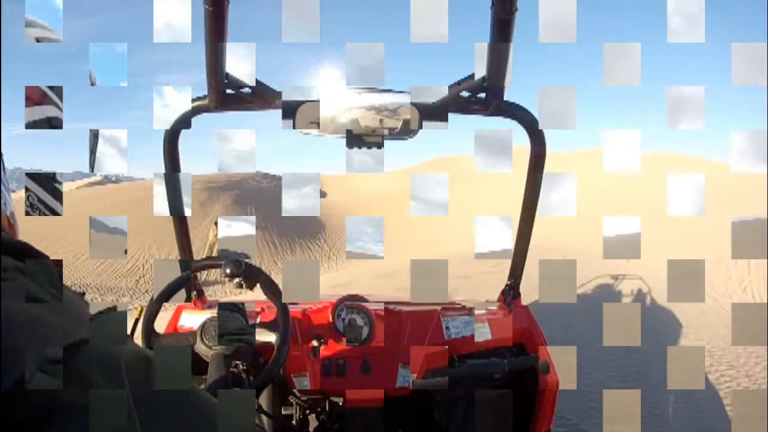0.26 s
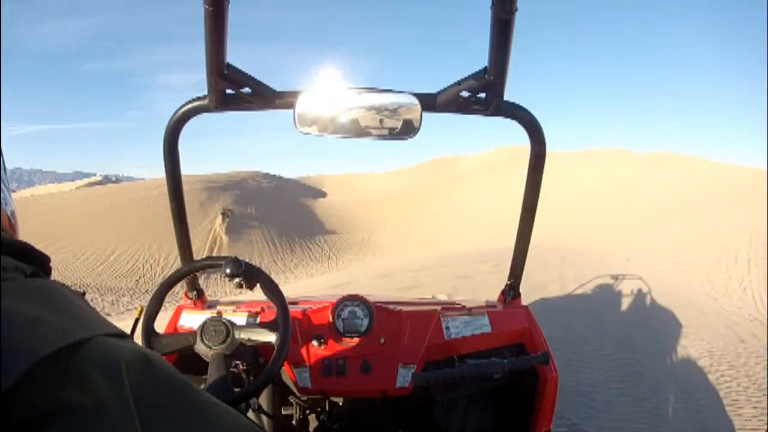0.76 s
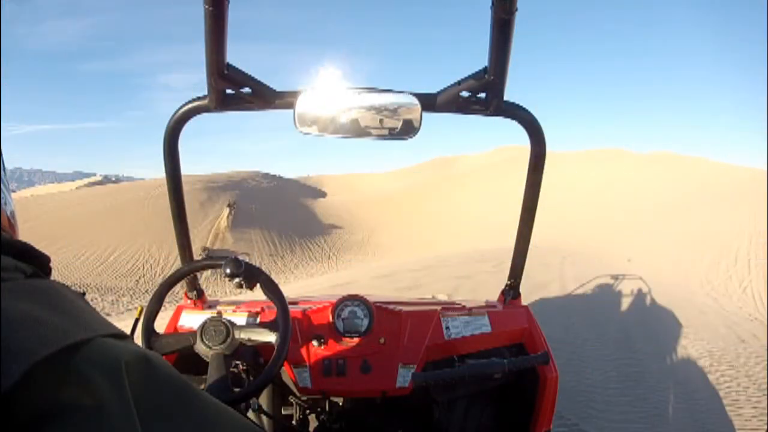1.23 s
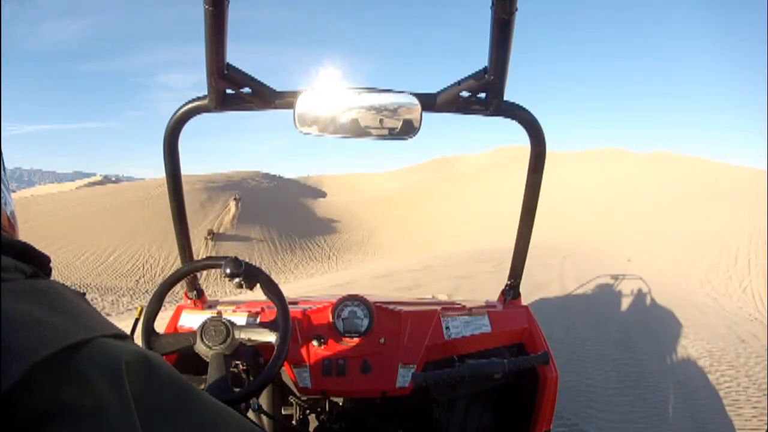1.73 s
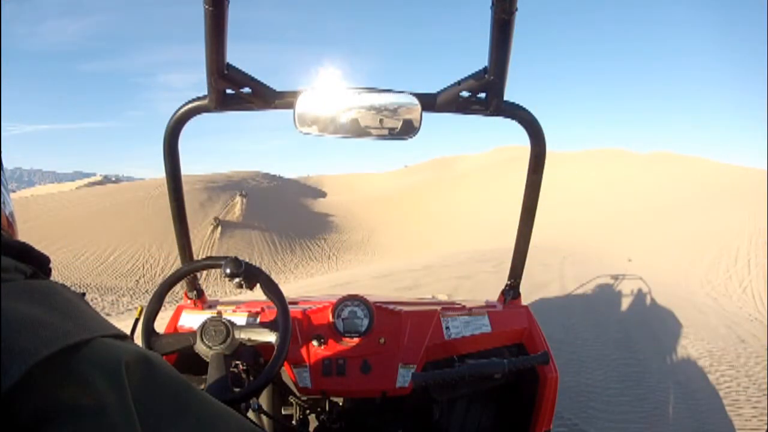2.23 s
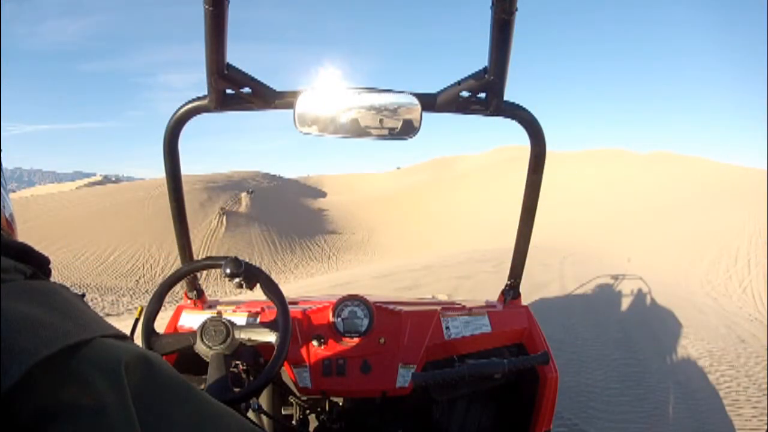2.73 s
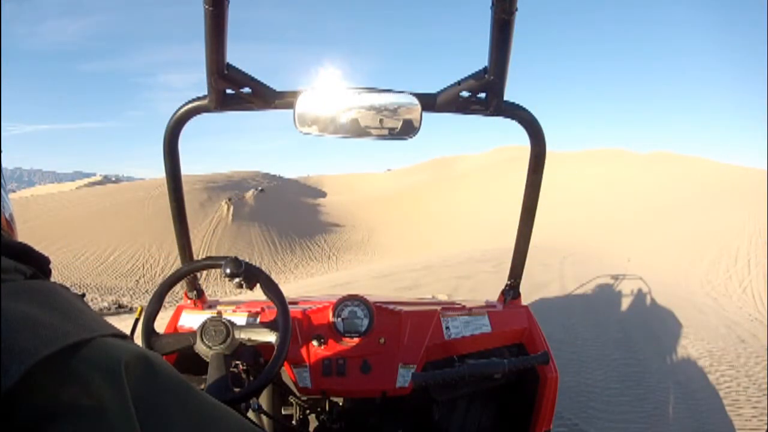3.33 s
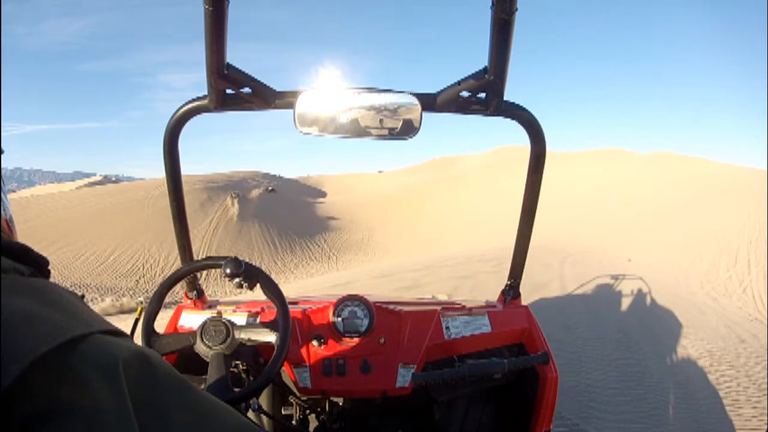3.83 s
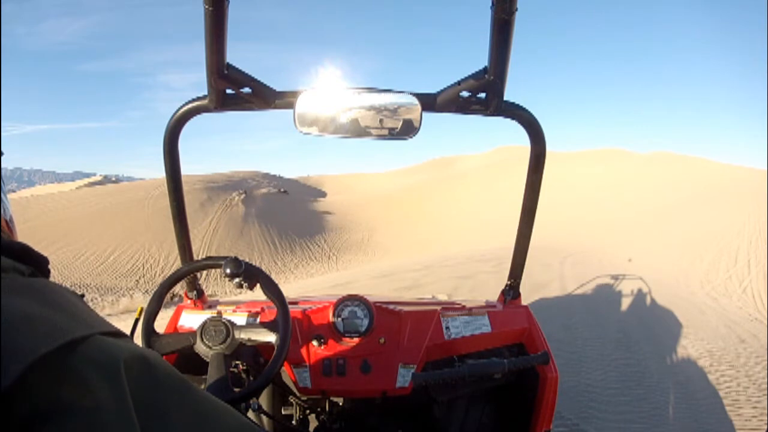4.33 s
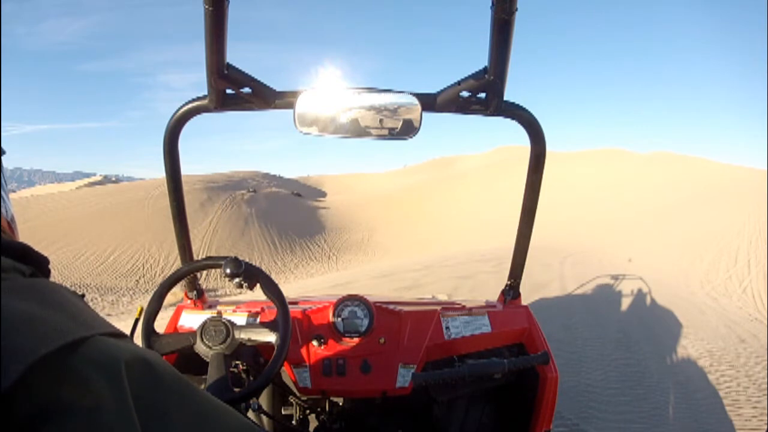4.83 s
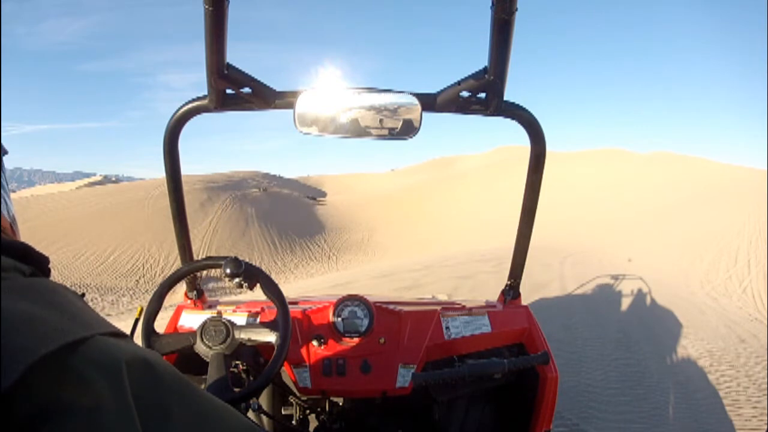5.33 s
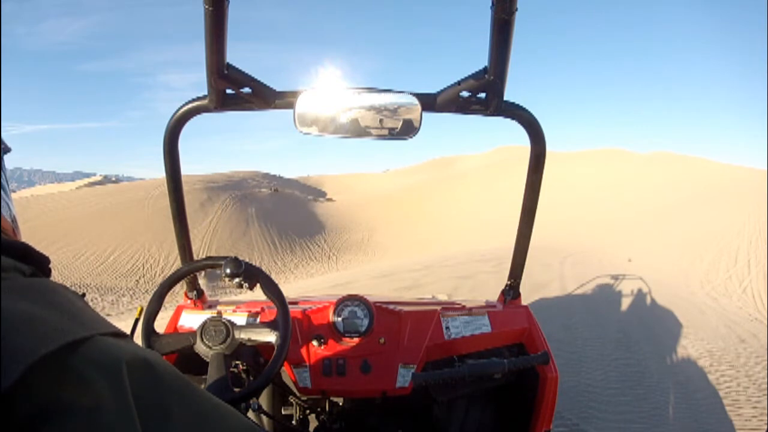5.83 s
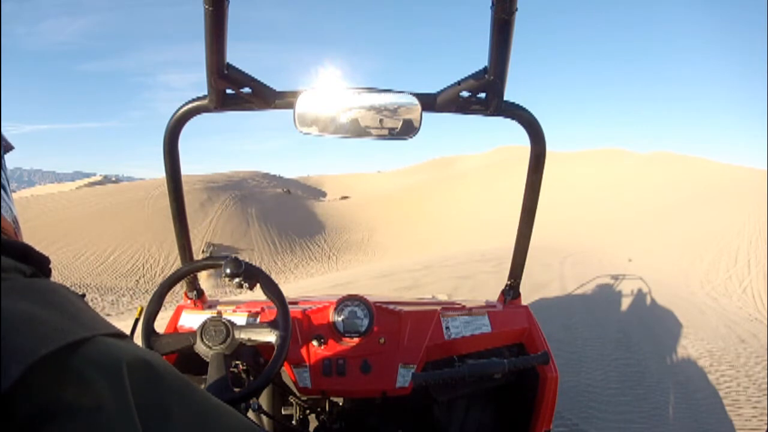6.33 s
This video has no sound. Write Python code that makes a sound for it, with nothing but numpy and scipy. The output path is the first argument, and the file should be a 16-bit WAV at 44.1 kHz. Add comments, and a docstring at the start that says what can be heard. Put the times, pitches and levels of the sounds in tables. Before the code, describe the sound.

A brief close off-road engine roar stops abruptly, leaving faint muffled far motors, soft wind thuds, small plastic ticks and footsteps in sand.

```python
"""A twin engine drones close by in the wind: a camera in a closed housing rides an open buggy.
Then a hard cut to the parked buggy among dunes: one far engine revs twice, another nears as a low tone, wind
thuds on the housing and feet crunch nearby. Engines are sines at multiples of their speed; wind and sand are
coloured noise, and the housing adds its resonances.
The camera holds each sample for 1/12000 s, which mirrors the sound around 12 kHz."""
import sys
import numpy as np
from scipy import signal
from scipy.fft import rfft, irfft, next_fast_len
from scipy.io import wavfile
from scipy.ndimage import uniform_filter1d

SR = 44100
rng = np.random.default_rng(int(sys.argv[2]) if len(sys.argv) > 2 else 0)


def generate_wav(sig):
    """Save sig (samples, or channels by samples) to the path in sys.argv[1] as 16-bit PCM at SR."""
    pcm = np.round(np.clip(np.atleast_2d(sig).T, -1, 1) * 32767).astype(np.int16)
    wavfile.write(sys.argv[1], SR, pcm)


N = 289737
CUT_S = .6638  # the drive ends and the parked scene begins


def amp(db):
    """Turns decibels into a gain."""
    return 10 ** (np.asarray(db) / 20)


def evened(x):
    """Scales a sound to an average (rms) level of 1."""
    return x / np.sqrt(np.mean(x ** 2) + 1e-20)


def curves(rows):
    """Joins the rows of a table by straight lines: one curve for each column after the time."""
    s, *columns = np.transpose(rows)
    return [np.interp(np.arange(N) / SR, s, column) for column in columns]


def swells(rows):
    """Bell-shaped rises and falls in level."""
    t = np.arange(N) / SR
    return sum(amp(db) * np.exp(-((t - s) / np.where(t < s, rise, fall)) ** 2)
               for s, db, rise, fall in rows)


def shaped(x, points):
    """Colours a sound by a spectrum; padding keeps the start from wrapping round to the end."""
    f, db = np.transpose(points)
    size = next_fast_len(len(x) + SR)
    hz = np.fft.rfftfreq(size, 1 / SR)
    gain = amp(np.interp(np.log(hz + 1), np.log(f + 1), db))
    return irfft(rfft(x, size) * gain, size)[:len(x)]


def resonate(x, hz, width):
    """A resonance of gain 1: shifts its frequency down to zero, smooths, and shifts back."""
    turn = np.exp(2j * np.pi * np.cumsum(hz * np.ones(len(x))) / SR)
    r = np.exp(-np.pi * width / SR)
    return 2 * (turn * signal.lfilter([1 - r], [1, -r], x / turn)).real


def modes(x, table):
    """A body that rings at its own frequencies (modes), added with alternating sign."""
    return sum((-1) ** k * amp(db) * resonate(x, hz, width) for k, (hz, width, db) in enumerate(table))


def drift(per_s, length=N):
    """Slow random wandering of rms 1, smoothed over about 1/per_s seconds."""
    steps = rng.standard_normal(length // 64 + 2)
    span = int(SR / 64 / per_s / 2) + 1
    smooth = uniform_filter1d(uniform_filter1d(steps, span), span)
    return np.interp(np.arange(length) / 64, np.arange(len(steps)), evened(smooth))


def stack(hz, multiples, levels, waver_db, per_s):
    """Sines at multiples of a speed, each wavering in level and phase as firings differ."""
    turns = 2 * np.pi * np.cumsum(hz) / SR
    total = 0
    for k, level in zip(multiples, levels):
        wavering = level * amp(waver_db * drift(per_s, len(hz)))
        phase = 2 * np.pi * rng.random() + 0.16 * drift(per_s, len(hz))
        total = total + wavering * np.sin(k * turns + phase)
    return total


# The ridden engine. Each row: time in seconds, crank turns in Hz, exhaust level in dB, rattle level in dB.
DRIVE = [(0.0, 48.2, -20, -23), (0.044, 48.6, -21.5, -24), (0.66, 49.06, -21.5, -26)]
# Balance of the exhaust tones in dB, one for each multiple 2-34 of the crank speed.
EXHAUST_ORDERS = [4, -20, -3, -22, -19, -34, -4, -7, -7, -20, -8, -16, -6, 0, -2, -6, -22, -15, -20, -30,
                  -12, -20, -30, -30, -19, -24, -11, -20, -30, -24, -30, -7, -12]
# Colour of the shaking frame and panels. Each row: frequency in Hz, relative noise level in dB per Hz.
RATTLE_COLOUR = [(88, -10), (150, 2), (204, -7), (333, -15), (383, -3.5), (626, -1.5), (741, 3),
                 (993, -14.5), (1270, -5.5), (1750, -13), (2300, -14), (3240, -21.5), (3780, -23),
                 (4500, -40), (5900, -44), (7670, -71)]
# Ringing panels. Each row: frequency in Hz, width in Hz, relative level in dB.
PANELS = [(542, 18, -1), (730, 75, -6), (1261, 14, 8), (1387, 22, -5), (1615, 9.3, 4.5), (1850, 68, -3.5),
          (1940, 10, -6), (2160, 8.4, -8), (2590, 25, -21), (2620, 12, -9), (2940, 14, -8.5),
          (3764, 133, -9.5), (4040, 20, -10)]
HALF_ORDER_DB = -26  # the engine rocks the frame at 1.5 times crank speed


def own_engine():
    """Exhaust tones at multiples of the crank speed, and frame and panels rattled at each firing."""
    hz, exhaust_db, rattle_db = (curve[:round(CUT_S * SR)] for curve in curves(DRIVE))
    multiples = 2 + np.arange(len(EXHAUST_ORDERS))
    exhaust = evened(stack(hz, multiples, amp(EXHAUST_ORDERS), waver_db=1.5, per_s=7))
    rocking = stack(hz, [3 / 2], [amp(HALF_ORDER_DB)], waver_db=3, per_s=9)
    firing = (2 * np.cumsum(hz) / SR) % 1  # two firings a turn; 0-1 from one to the next
    shake = (1.1 + np.exp(-firing / 0.52)) * rng.standard_normal((len(PANELS) + 1, len(hz)))
    panels = sum(modes(own, [panel]) for own, panel in zip(shake[1:], PANELS))
    rattle = amp(-2.0) * evened(shaped(shake[0], RATTLE_COLOUR)) + amp(-3.0) * evened(panels)
    engine = amp(exhaust_db) * exhaust + amp(rattle_db) * rattle + rocking
    return np.pad(engine, (0, N - len(hz)))


# The loudest low thuds that jolts and gusts knock into the housing.
# Each row: time in seconds, strength in dB before the housing colours it, length in seconds (0.01 at least).
THUDS = [(0.04, -0.5, 0.0083), (0.068, -4.5, .018), (0.114, -0.5, 0.012), (0.147, -0.5, 0.013),
         (0.185, -1.5, 0.013), (0.293, 0.5, 0.012), (0.328, 0, 0.011), (0.387, -7, 0.012),
         (0.463, -2.5, 0.013), (0.537, -3.5, 0.017), (0.583, -7, 0.039), (1.333, -28, 0.055),
         (1.58, -29.5, 0.02), (2.109, -27.5, 0.025), (3.142, -32, .03), (3.603, -32.5, 0.023),
         (3.775, -25.5, 0.059), (3.908, -27, 0.021), (3.982, -27.5, 0.06), (4.049, -24, 0.011),
         (4.126, -30.5, 0.016), (4.498, -29.5, 0.081), (4.652, -30.5, 0.032), (4.962, -25, 0.023)]
# The housing's lowest resonances. Each row: frequency in Hz, level in dB per Hz.
BOOM = [(20, -21.5), (42, -28), (54, -24.5), (66, -3), (74, 0), (86, -9), (99, -3), (112, -9), (124, -8.5),
        (160, -28.5), (300, -71), (20000, -99)]
# Steady wind: at the start and the end of the drive.
HEADWIND_DB, SLOWING_DB = -26, -29
# Wind when parked: its level counted from time 0, and how fast it freshens.
BREEZE_DB, FRESHENS_DB_PER_S = -51, 0.8


def buffet():
    """Wind and single short pushes both ring the housing's lowest resonances."""
    t, pushes = np.arange(N) / SR, np.zeros(N)
    driving_db = HEADWIND_DB + (SLOWING_DB - HEADWIND_DB) * t / CUT_S
    parked_db = BREEZE_DB + FRESHENS_DB_PER_S * t
    level_db = np.where(t < CUT_S, driving_db, parked_db)
    wind = amp(level_db + 1.5 * drift(4.3)) * evened(shaped(rng.standard_normal(N), BOOM))
    for (s, db, length), start in zip(THUDS, rng.random(len(THUDS))):
        bell = np.exp(-2.8 * ((t - s) / max(length, .01)) ** 2)
        pushes += amp(db) * bell * np.sin(2 * np.pi * (86. * t + start))
    return wind + shaped(pushes, BOOM)


# The far engine that revs twice. Each row: time in seconds, engine cycles in Hz.
REV_SPEED = [(.67, 19), (1.05, 20.5), (1.35, 22.8), (1.65, 23.3), (2.1, 23.4), (2.4, 21.1), (2.7, 20.65),
             (3.3, 20.5), (3.65, 20.9), (4.45, 21), (4.75, 19.75), (5.05, 20.6), (5.25, 22), (5.7, 23.2),
             (6.2, 24.1), (6.57, 24.25)]
# Its throttle. Each row: time in seconds, load from 0 to 1.
REV_LOAD = [(1.05, 0.63), (1.4, 0.89), (2.15, 0.99), (2.4, 0.4), (3.8, 0.17), (4.8, 0.1), (5.4, 0.65),
            (5.9, 0.46)]
# Balance of its tones in dB, one for each multiple 4-19 of the cycle speed: under load, then coasting.
PULLING = [-18, 4, -14, -15, -13, -13, -11, -10, -8, -8, -15, -21, -30, -34, -36, -36]
COASTING = [-6, -10, -8, -14, -2, -18, -9, -22, -22, -18, -24, -12, -26, -26, -28, -15]
REV_IDLE_DB, REV_FULL_DB = -54.5, -47  # added to those balances without load and at full load
# Single tones that sing out for a while.
# Each row: multiple of the cycle speed, time of the crest in seconds, level in dB, rise and fall in seconds.
WHINES = [(19, 0.945, -62, 0.42, 0.25), (19, 4.23, -64, 1.3, 0.32), (9, 6.15, -50.5, 0.18, 0.25),
          (8, 4.17, -55.5, 0.26, 0.29), (18, 5.41, -56, 0.51, 0.29), (18, 6.32, -62, 0.29, 0.74),
          (34, 6.4, -60.5, 0.17, 0.4)]
# The second far engine, one firing tone that nears and sags. Each row: time in seconds, Hz, level in dB.
HUMMER = [(2.8, 146, -72), (3.5, 143.5, -53), (4.09, 141, -48), (4.91, 133.6, -39.5), (5.3, 131.8, -39.5),
          (5.94, 130.6, -38.5), (6.57, 130.6, -42.5)]


def far_engines():
    """Load blends the first engine from its coasting to its pulling tones; the second is one low tone."""
    (hz,), (load,) = curves(REV_SPEED), curves(REV_LOAD)
    levels = []
    for idle_db, pull_db in zip(COASTING, PULLING):
        levels.append(amp((1 - load) * (REV_IDLE_DB + idle_db) + load * (REV_FULL_DB + pull_db)))
    revver = stack(hz, range(4, 20), levels, waver_db=3, per_s=6)
    whine_levels = [swells([row]) for _, *row in WHINES]
    whine = stack(hz, [round(k) for k, *_ in WHINES], whine_levels, waver_db=3.5, per_s=10)
    tone_hz, tone_db = curves(HUMMER)
    hummer = stack(tone_hz, [1], [amp(tone_db)], waver_db=.8, per_s=4)
    return revver + whine + hummer


# Sand underfoot. Each row: time in seconds, strength in dB, low and high modes in dB against the middle
# before each band's own gain, and time in seconds to die away by 60 dB.
CRUNCHES = [(1.318, -34, -1, -14, 0.22), (1.962, -44, 5.5, -10, 0.19), (2.161, -47, 6, -5.5, 0.16),
            (3.107, -33, -5.5, -14.5, 0.16), (4.25, -47.5, 7.5, -18.5, 0.2), (4.292, -44.5, 6, -6.5, 0.15),
            (4.31, -49, -6, -3, 0.23), (4.322, -45.5, 11, -14, 0.063), (5.18, -33.5, -1, -14, 0.17),
            (5.875, -43, 6.5, -8, 0.1), (6.43, -37, -3, -11.5, 0.23)]
# The housing's modes, shared by all sand and tick sounds.
# Each row: frequency in Hz, width in Hz, relative level in dB.
HOUSING = [(660, 56, 3.5), (769, 48, 0.5), (826, 11.4, 7), (929, 12, 2), (1117.5, 25, 2.5), (1378, 20, 7.5),
           (1467, 35, 2.5), (1612, 14, 9), (1654, 21, 2.5), (1878, 32, 10), (2690, 23, -1), (2950, 19, 3),
           (3337, 117, 3), (3664, 76, 5), (3850, 17, 1), (4105, 48, -11), (4610, 97, -17.5),
           (4680, 39, -12), (5260, 50, -15.5), (5670, 55, -14)]
# Colour of hissing sand, here and in the open air. Each row: frequency in Hz, relative level in dB per Hz.
HISS = [(300, 0), (450, 1), (746, -30), (877, -22), (1000, -8), (1300, -5.5), (1750, -2.5), (2800, -8.5),
        (3070, -13), (3250, -7.5), (3900, -9), (4300, -13), (5900, -23.5), (7000, -69)]
# Colour of sliding sand, here and in the scuffs. Each row: frequency in Hz, relative level in dB per Hz.
SLIDE = [(700, -22), (1500, -2), (2600, -3), (3800, 0), (4200, -15), (5500, -17), (5900, -32), (7000, -60)]


def crunches():
    """Grains of sand land at once, die away, trickle on, and ring the low, middle and high housing modes."""
    t, low, middle, high = np.arange(N) / SR, np.zeros(N), np.zeros(N), np.zeros(N)
    for s, db, low_db, high_db, t60 in CRUNCHES:
        age = np.maximum(t - s, 0)
        trickle = amp(-16.0 - 60 * age / 1.1)
        onset = 1 - np.exp(-age / 0.0015)
        shape = amp(db) * (amp(-60 * age / t60) + trickle) * onset
        low += shape * amp(low_db)
        middle += shape
        high += shape * amp(high_db)
    grains = rng.standard_normal(N) * amp(4 * drift(250))
    body = amp(-12.5) * evened(modes(grains, HOUSING[4:10])) + amp(-17.0) * evened(shaped(grains, HISS))
    treble = modes(grains, HOUSING[10:15]) + amp(17.5) * modes(grains, HOUSING[15:])
    edge = evened(shaped(treble, SLIDE))
    return amp(7.0) * modes(low * grains, HOUSING[:2]) + middle * body + high * edge


# Small plastic ticks. Each row: time in seconds, strength in dB, hollow ring in Hz,
# hollow ring in dB against the strength, treble in dB before its own gain.
TICKS = [(2.996, -41, 410, -14, -15), (3.596, -31, 408, -9, -5.5), (3.752, -33, 412, -8, -24),
         (3.976, -45, 580, -2.5, -19), (4.106, -51, 560, 1, -24), (4.483, -47, 420, -2, -40),
         (4.769, -37, 404, -9, -7), (4.998, -41, 413, -7, 0.5), (5.065, -37, 408, -10, -19),
         (5.155, -43, 408, -12, -20), (5.42, -38, 550, -11, -24)]


def ticks():
    """A dull click, a short hollow ring of the part itself, and the housing's modes."""
    out, t = np.zeros(N), np.arange(4000) / SR
    pulse = np.exp(-t / 0.0012) * (1 - np.exp(-t / 0.00068))
    click = pulse * rng.standard_normal((len(TICKS), len(t)))
    typical = np.linalg.norm(click) / np.sqrt(len(TICKS))
    click *= typical / np.linalg.norm(click, axis=1, keepdims=True)  # alike in energy
    for (s, db, ring_hz, ring_db, bright_db), crack in zip(TICKS, click):
        ring = np.sin(2 * np.pi * ring_hz * t) * amp(-60 * t / .06)
        body = amp(10.5) * modes(crack, HOUSING[:9])
        edge = amp(10.0) * modes(crack, HOUSING[10:]) + 0.59 * crack
        part = out[round(s * SR):][:len(t)]
        part += amp(db) * (amp(ring_db) * ring + body + amp(bright_db) * edge)
    return out


# Feet dragged through sand. Each row: time of the crest in seconds, level in dB, rise and fall in seconds.
SCUFFS = [(3.16, -61, 0.18, 0.11), (6.1, -55.5, 0.1, 0.11), (6.22, -55, 0.12, 0.2)]


def scuffs():
    """Sliding sand: a bright rush of noise that swells and fades."""
    sand = rng.standard_normal(N) * amp(1.8 * drift(150))
    rush = evened(shaped(sand, SLIDE)) + amp(-1.5) * evened(modes(sand, HOUSING[11:16]))
    return swells(SCUFFS) * rush


# One brief high sizzle, a single row: level in dB, Hz, width in Hz, seconds to die away by 60 dB.
SIZZLE = (-57, 5400, 350, 0.06)
SIZZLE_S = 6.305  # its start


def sizzle():
    """A narrow burst of treble noise, passed twice through one resonance."""
    db, hz, width, t60 = SIZZLE
    age = np.arange(N) / SR - SIZZLE_S
    band = evened(resonate(resonate(rng.standard_normal(N), hz, width), hz, width))
    return band * (age > 0) * amp(db - 60 * np.maximum(age, 0) / t60)


def faint_tone():
    """A thin 511 Hz tone that sets in at 1 s and fades over about half a second, wavering slightly."""
    level = swells([(1, -66.5, 0, 0.5)])  # crest in s, dB, rise and fall in s
    return stack(np.full(N, 511), [1], [level], waver_db=1.5, per_s=5)


# Hiss of wind and sand in the open air. Each row: time in seconds, level in dB.
AIR = [(.67, -48), (.9, -52.5), (1.4, -55.5), (2.1, -58.5), (2.5, -60.5), (4.1, -63.5), (4.9, -64.5),
       (5.4, -59), (6.57, -52.5)]
# Colour of the low wash. Each row: frequency in Hz, relative level in dB per Hz.
WASH = [(59, -23), (100, -5.5), (303, -14), (412, -16.5), (468, -31), (600, -19.5), (780, -20.5),
        (1320, -120)]
WASH_DB, WASH_FROM_S, WASH_RISE_DB_PER_S = -55.5, 1.4, 20  # builds up until WASH_FROM_S, then holds


def air():
    """Low wash of wind and far traffic, and sand hiss heard through the housing: coloured noise."""
    hiss_db, = curves(AIR)
    wash_db = WASH_DB + WASH_RISE_DB_PER_S * np.minimum(np.arange(N) / SR - WASH_FROM_S, 0)
    gusts_db = 1.3 * drift(9)
    wash = evened(shaped(rng.standard_normal(N), WASH)) * amp(wash_db + gusts_db)
    grit = rng.standard_normal(N) * amp(1.04 * drift(20.1))
    hiss = amp(-2.5) * evened(shaped(grit, HISS)) + amp(-2.0) * evened(modes(grit, HOUSING))
    return wash + amp(hiss_db) * hiss


def scene():
    """The drive is cut straight to the quiet dunes; one microphone feeds both channels."""
    parked = np.arange(N) >= CUT_S * SR
    dunes = far_engines() + faint_tone() + air() + scuffs() + crunches() + ticks() + sizzle()
    mono = own_engine() + buffet() + parked * dunes
    return np.array([mono, mono])


HOLD_HZ = 12000  # how often the camera takes a sample
EDGE_HZ = 15350  # nothing is kept far above this


def record(dry):
    """Samples taken at the hold rate repeat the spectrum; holding each one weighs it by a sinc curve."""
    kept = signal.oaconvolve(dry, signal.firwin(255, HOLD_HZ / 2, fs=SR)[None], "same")
    sampled = kept * (1 + 2 * np.cos(2 * np.pi * HOLD_HZ * np.arange(N) / SR))
    holding = np.sinc(np.fft.rfftfreq(2 * N, 1 / SR) / HOLD_HZ)
    held = irfft(rfft(sampled, 2 * N) * holding)[:, :N]
    edge = signal.firwin(1023, EDGE_HZ, window=("kaiser", 9), fs=SR)
    return signal.oaconvolve(held, edge[None], "same")


dry = scene()
out = record(dry)
generate_wav(out)
```